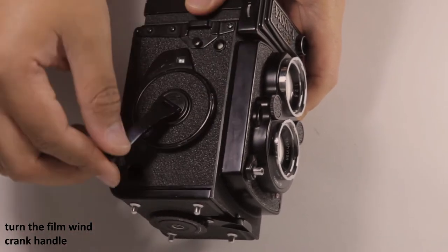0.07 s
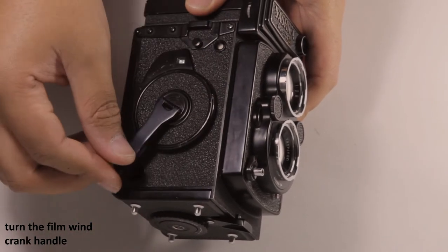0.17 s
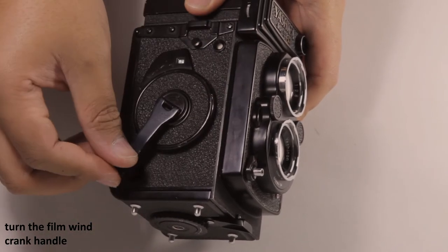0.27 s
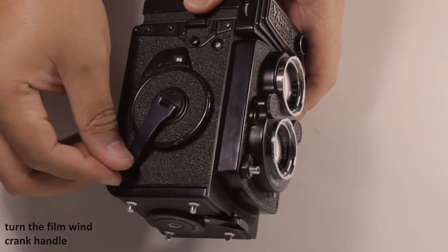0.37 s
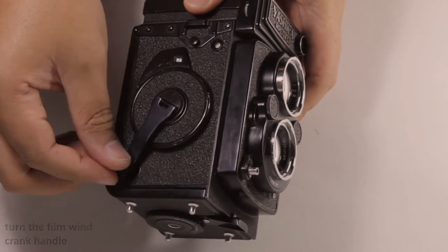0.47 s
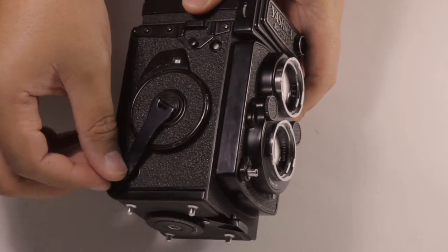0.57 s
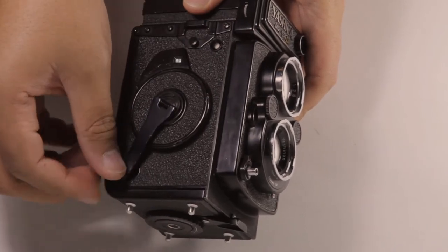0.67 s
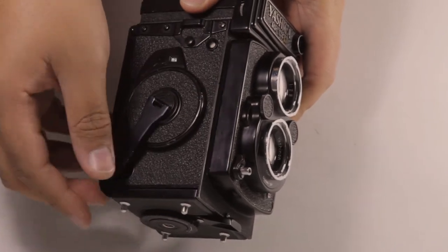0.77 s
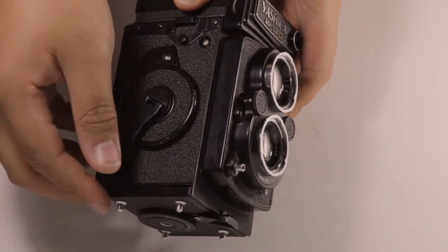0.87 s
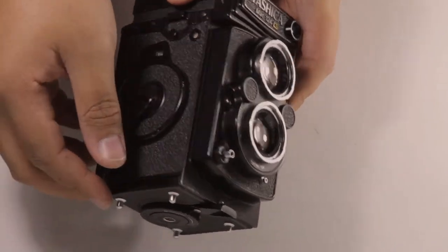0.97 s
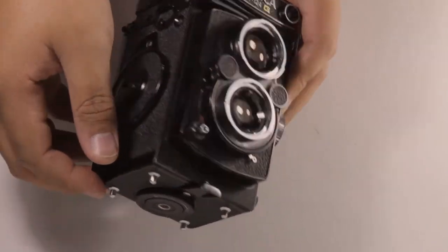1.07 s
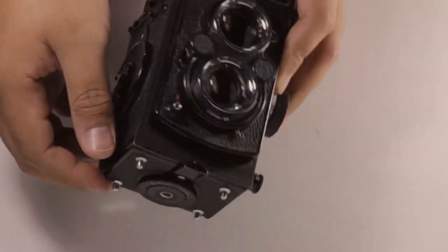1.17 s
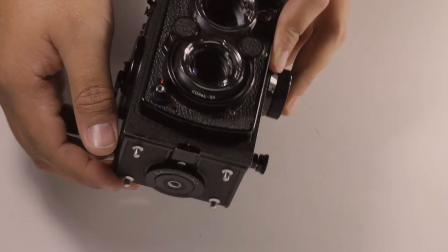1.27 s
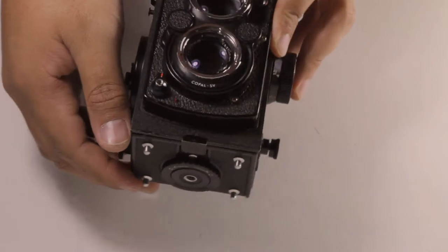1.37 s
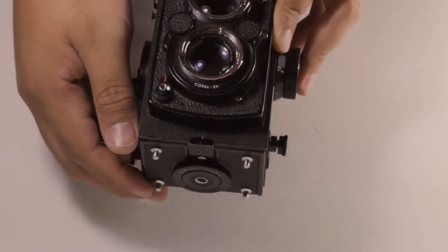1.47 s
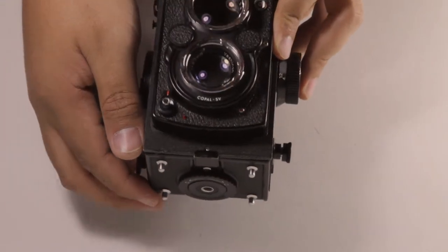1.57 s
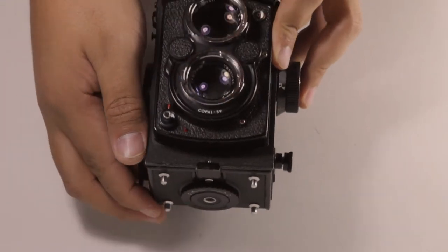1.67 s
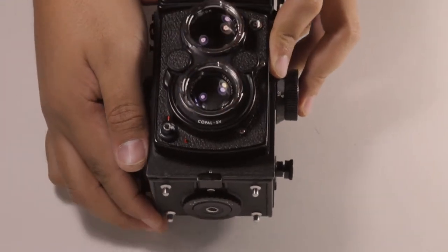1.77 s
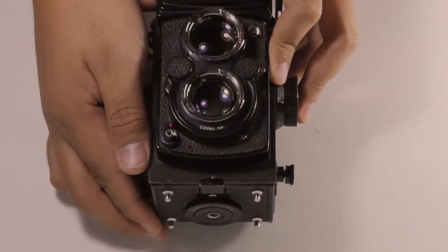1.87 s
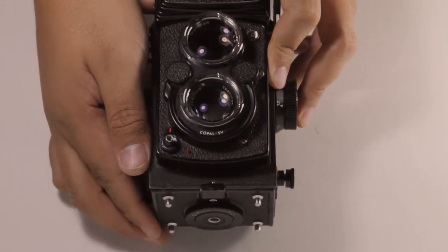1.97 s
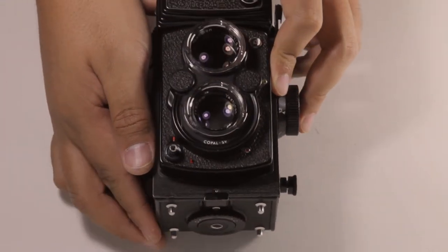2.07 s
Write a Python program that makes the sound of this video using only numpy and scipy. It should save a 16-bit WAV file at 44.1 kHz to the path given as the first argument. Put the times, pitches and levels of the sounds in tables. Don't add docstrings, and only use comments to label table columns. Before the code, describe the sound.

Close up in a small quiet room, one bright hard snap leads several smaller metallic clicks and soft finger thumps from a camera crank, then a brief faint drag, a pause, and gentle rubbing with a tiny tap.

```python
import sys
import numpy as np
from scipy import signal
from scipy.fft import rfft, irfft
from scipy.io import wavfile
from scipy.ndimage import uniform_filter1d

SR = 44100
rng = np.random.default_rng(int(sys.argv[2]) if len(sys.argv) > 2 else 0)


def unload_wav(signal):
    wavfile.write(
        sys.argv[1],
        SR,
        np.round(np.clip(np.atleast_2d(signal).T, -1, 1) * 32767).astype(np.int16),
    )


def gain_from_db(level_db):
    decades = np.asarray(level_db, float) / 20
    return 10 ** decades


N = 92610


def evened(x):
    return x / np.sqrt(np.mean(x ** 2) + 1e-20)


def read(points, hz):
    f, value = np.transpose(points)
    return np.interp(np.log(hz + 1), np.log(f + 1), value)


def add(mix, s, sound):
    part = mix[round(s * SR):][:len(sound)]
    part += sound[:len(part)]


def coloured(x, gain):
    return irfft(rfft(x) * gain(np.fft.rfftfreq(len(x), 1 / SR)), len(x))


def resonate(x, hz, width_hz):
    turn = np.exp(2j * np.pi * np.cumsum(hz * np.ones(len(x))) / SR)
    r = np.exp(-np.pi * width_hz / SR)
    return 2 * (turn * signal.lfilter([1 - r], [1, -r], x / turn)).real


def part_gain(colour, rings, f, spread):
    gain = gain_from_db(read(colour, f))
    for hz, width_hz, db in rings:
        widening = 1 + spread * hz
        detune = 2 * (f - hz) / max(width_hz, 50) / widening
        gain = gain + gain_from_db(db) * np.minimum(f / hz, 1) ** 2 / np.sqrt(widening) / (1 + detune ** 2)
    return gain


def minimum_phase(gain):
    cep = irfft(np.log(gain + 1e-6))
    cep[1:2048] *= 2
    cep[2048:] = 0
    return irfft(np.exp(rfft(cep)))


def blow(colour, rings, s, peak_db, contact_s):
    slip_s, slip_db, ring_spread_hz = 0.0015, -38, 3000
    t, f = np.arange(4096) / SR - slip_s, np.fft.rfftfreq(4096, 1 / SR)
    press = np.where(t < 0, gain_from_db(slip_db), np.exp(-(t / max(contact_s, 1e-5)) ** 2))
    force = press * rng.standard_normal(len(t))
    force[round(slip_s * SR)] = 1.2
    unevenness = np.sqrt(uniform_filter1d(abs(rfft(force)) ** 2, size=8))
    both = []
    for spread in (0, 1 / ring_spread_hz):
        body = minimum_phase(part_gain(colour, rings, f, spread) / unevenness)
        both.append(signal.fftconvolve(force, body)[:len(t)])
    return s - slip_s, gain_from_db(peak_db) * np.transpose(both) / abs(both[0]).max()


def blows(colour, rings, hits):
    out = np.zeros((N, 2))
    for hit in hits:
        add(out, *blow(colour, rings, *hit))
    return out


# pitch_hz, level_db per Hz
HANDLE_COLOUR = [(200, -58), (500, -39.5), (900, -45), (2600, -18), (5000, -20), (11500, -7), (15000, -7),
                 (16500, -20.5)]
# pitch_hz, width_hz, level_db over the crack
HANDLE_RINGS = [(1214, 115, 1), (1806, 160, -4.5), (3620, 550, -5), (6660, 440, -1.5), (9600, 730, 4),
                (11800, 400, 1), (12000, 630, -8), (13100, 414, -12.5), (15130, 650, -6.5)]
# start_s, peak_db, contact_s
HANDLE_HITS = [
    (0.2115, 0.0038, 0.0019),
]


def handle():
    return blows(HANDLE_COLOUR, HANDLE_RINGS, HANDLE_HITS)


# pitch_hz, level_db per Hz
PAWL_COLOUR = [(1180, -52.5), (2000, -36), (3060, -20), (4710, -19), (6950, -6.5), (8290, -7), (11600, 1),
               (16500, -13.5)]
# pitch_hz, width_hz, level_db over the crack
PAWL_RINGS = [(7000, 590, -4), (11400, 710, -3.5), (14300, 950, -1), (3220, 550, -10)]
# start_s, peak_db, contact_s
PAWL_HITS = [
    (0.127, -28, 0.00077),
]


def pawl():
    return blows(PAWL_COLOUR, PAWL_RINGS, PAWL_HITS)


# pitch_hz, level_db per Hz
HINGE_COLOUR = [(1470, -44), (2500, -28), (3070, -2), (4630, -5), (8110, -3.5), (9350, -4), (13900, 0.5),
                (16500, -10.5)]
# pitch_hz, width_hz, level_db over the crack
HINGE_RINGS = [(6830, 1000, 1), (12000, 1500, -3), (13950, 700, 3), (8750, 600, -14)]
# start_s, peak_db, contact_s
HINGE_HITS = [
    (0.3460, -22.5, 0.0037),
    (0.352, -27, 0.0015),
    (0.358, -31, 0.005),
]


def hinge():
    return blows(HINGE_COLOUR, HINGE_RINGS, HINGE_HITS)


# pitch_hz, level_db per Hz
CATCH_COLOUR = [(1470, -39), (2500, -18), (5330, -12), (7500, -11), (9500, -4), (13000, -2), (15000, 0),
                (16500, -33)]
# pitch_hz, width_hz, level_db over the crack
CATCH_RINGS = [(9600, 810, -2), (13000, 720, 0.52), (14300, 350, 0)]
# start_s, peak_db, contact_s
CATCH_HITS = [
    (0.3903, -33, 0.003),
]


def catch():
    return blows(CATCH_COLOUR, CATCH_RINGS, CATCH_HITS)


# pitch_hz, level_db per Hz
BOX_COLOUR = [(240, -27), (500, -29), (1500, -22), (2300, -9), (4500, -12.5), (6200, -16), (9500, -16),
              (13000, -8), (15500, -29.5)]
# pitch_hz, width_hz, level_db over the crack
BOX_RINGS = [(778, 185, 6), (1233, 190, -0.5), (1640, 390, 2), (2580, 140, -0.5), (3400, 620, -4.5),
             (5800, 410, -9), (7650, 170, -23), (12300, 320, -23), (12800, 420, -18)]
# start_s, peak_db, contact_s
BOX_HITS = [
    (0.5368, -12.5, 0.0011),
]


def box():
    return blows(BOX_COLOUR, BOX_RINGS, BOX_HITS)


# pitch_hz, level_db per Hz
PIN_COLOUR = [(1000, -54), (5000, -42), (8000, -32), (10500, -14.5), (13000, -21), (15300, -4),
              (16800, -19)]
# pitch_hz, width_hz, level_db over the crack
PIN_RINGS = [(11500, 800, 0), (14150, 330, 5), (1420, 700, -22), (12900, 400, -8)]
# start_s, peak_db, contact_s
PIN_HITS = [
    (0.7246, -13, 0.00073),
]


def pin():
    return blows(PIN_COLOUR, PIN_RINGS, PIN_HITS)


# pitch_hz, level_db per Hz
FOOT_COLOUR = [(120, -34), (250, -11), (2000, 1), (4600, 0.5), (8300, -10), (14800, -13), (16500, -46)]
# pitch_hz, width_hz, level_db over the crack
FOOT_RINGS = [(1120, 320, 9), (1940, 200, 4), (4670, 350, -12)]
# start_s, peak_db, contact_s
FOOT_HITS = [
    (1.8903, -29, 0.0006),
]


def foot():
    return blows(FOOT_COLOUR, FOOT_RINGS, FOOT_HITS)


# pitch_hz, level_db per Hz
PANEL_COLOUR = [(300, -15), (700, -35), (1300, -11), (2000, -16), (3500, -15.5), (6000, -65)]
# pitch_hz, width_hz, level_db over the crack
PANEL_RINGS = [(1305, 140, 7.5), (1900, 150, -1), (790, 150, 2.5), (485, 150, -9.5), (1590, 248, -9)]
# start_s, peak_db, contact_s
PANEL_HITS = [(0.131, -44.5, 0.002), (0.3469, -25, 0.0014), (0.3501, -25.5, 0.0018), (.354, -31.5, 0.0069),
              (.358, -32.5, 0.0037), (.362, -30.5, 0.0033), (0.373, -33.5, 0.0017), (1.013, -47, 0.0035),
              (1.978, -53, .003), (1.987, -49, .002), (2.019, -47, 0.0024), (2.022, -45, 0.0025),
              (2.033, -48, .004), (2.047, -55, 0.0021)]


def panel():
    return blows(PANEL_COLOUR, PANEL_RINGS, PANEL_HITS)


# pitch_hz, level_db per Hz
PAD_COLOUR = [(120, -11.5), (400, 4), (1000, -8.5), (1800, -4.5), (2600, -19.5), (4000, -15), (7000, -50)]
# pitch_hz, width_hz, level_db over the thud
PAD_RINGS = [(467, 540, -27)]
# start_s, peak_db, contact_s
PAD_HITS = [
    (0.338, -35.5, 0.00036),
    (0.3669, -29, .0003),
    (0.3834, -26, 0.00044),
    (1.827, -37, 0.0003),
]


def finger_pad():
    return blows(PAD_COLOUR, PAD_RINGS, PAD_HITS)


# pitch_hz, level_db per Hz
PALM_COLOUR = [(80, -19), (250, -9), (500, -10), (1200, -21), (3000, -44)]
# start_s, peak_db, contact_s
PALM_HITS = [
    (0.7374, -33, 0.0015),
    (0.746, -40.5, 0.0011),
]


def palm():
    return blows(PALM_COLOUR, [], PALM_HITS)


# start_s, length_s, level_db, start_hz, end_hz
SQUEAKS = [(.389, 0.068, -52, 11900, 11400), (0.25, 0.095, -60, 1200, 1260),
           (.728, 0.077, -62, 16000, 16000), (.73, 0.046, -68, 18000, 11500),
           (.543, 0.063, -53, 2620, 2700), (.543, .04, -52, 16000, 15000), (.55, .09, -56.5, 11000, 11200),
           (2.043, 0.047, -54, 13100, 12300), (2.049, .025, -57, 5700, 5650),
           (2.056, 0.016, -64, 7000, 8600)]


def squeaks():
    width_hz = 260
    out, noise = np.zeros(N), rng.standard_normal(N)
    for s, length, db, start_hz, end_hz in SQUEAKS:
        u = np.arange(0, 1, 1 / (length * SR))
        hz = start_hz + (end_hz - start_hz) * u
        tone = noise[round(s * SR):][:len(u)]
        tone = resonate(resonate(tone, hz, width_hz), hz, width_hz)
        add(out, s, gain_from_db(db - 12 * u) * np.sin(np.pi * u) ** 0.49 * evened(tone))
    return out


def grit(spread_db):
    grains_per_s = 5000
    size = gain_from_db(spread_db * np.minimum(rng.exponential(1, N), 4))
    size = size * (rng.random(N) < grains_per_s / SR)
    return evened(size * rng.standard_normal(N) + 0.26 * rng.standard_normal(N))


# start_s, level_db
DRAG_PUSHES = [
    [(.8, -72), (.9, -69), (.98, -59), (1.015, -51), (1.022, -79), (1.06, -90)],
    [(1.7, -82), (1.756, -82), (1.762, -59), (1.81, -61.5), (1.83, -56.5), (1.884, -60), (1.89, -59),
     (1.915, -55.5), (1.93, -61.5), (1.975, -55.5), (2.0, -56.5), (2.022, -51), (2.06, -58.5), (2.1, -59.5)],
]
# pitch_hz, level_db per Hz
DRAG_COLOUR = [(120, -24.5), (200, 1), (950, -1), (1840, 0.5), (2960, -8), (4040, -10.5), (5730, -15.5),
               (12800, -24), (16000, -36)]
# pitch_hz, width_hz, level_db
DRAG_RINGS = [
    [(1250, 120, -1.5), (2240, 220, -13), (3200, 160, -14.5), (3970, 200, -11.5), (9060, 190, -14.5)],
    [(570, 190, -6.5), (1480, 260, -12), (1770, 430, -16)],
]


def drag():
    t, out = np.arange(N) / SR, np.zeros(N)
    slips = grit(1.4)
    rub = evened(coloured(slips, lambda hz: gain_from_db(read(DRAG_COLOUR, hz))))
    for curve, rings in zip(DRAG_PUSHES, DRAG_RINGS):
        s, db = np.transpose(curve)
        push = gain_from_db(np.interp(t, s, db, -120, -120))
        ringing = sum(gain_from_db(level) * evened(resonate(slips, hz, width)) for hz, width, level in rings)
        out += push * (rub + ringing)
    return gain_from_db(1.5) * out


# start_s, length_s, level_db, centre_hz
BRUSHES = [(0.026, 0.08, -64.5, 13000), (1.204, 0.07, -65, 12000), (1.311, .04, -66, 12000),
           (1.764, 0.038, -57, 11500), (1.761, .035, -54.5, 4500), (1.9, 0.02, -56.5, 3960),
           (1.902, .018, -66, 10000), (2.042, 0.035, -57, 13500), (2.055, 0.029, -55, 5000),
           (2.082, .018, -62, 12500)]


def brushes():
    octaves, floor_db = 0.3, 3
    out, slips = np.zeros(N), grit(1.55)
    for s, length, db, centre_hz in BRUSHES:
        part = slips[round(s * SR):][:round(length * SR)]
        u = np.arange(len(part)) / len(part)

        def tint(hz):
            band = np.exp(-(np.log2((hz + 1) / centre_hz) / octaves) ** 2)
            return gain_from_db(floor_db) * hz / (hz + 2500) + band

        add(out, s, gain_from_db(db) * np.sin(np.pi * u ** 0.63) * evened(coloured(part, tint)))
    return out


# delay_s, level_db
ECHOES = [(.0028, -14), (.0086, -19), (.0148, -24), (.019, -31), (.0235, -33), (.03, -37)]
# pitch_hz, t60_s
ROOM_DECAY = [(300, 0.3), (1200, 0.33), (4000, 0.27), (10000, 0.26), (16000, 0.11)]


def room(direct, spread):
    tail_db, tail_start_s, smear_s = -11, 0.0016, 0.0002
    hz, t, z = signal.stft(rng.standard_normal(SR // 2), SR, nperseg=128)
    tail = signal.istft(z * gain_from_db(-60 * t / read(ROOM_DECAY, hz)[:, None]), SR, nperseg=128)[1]
    tail *= np.clip(np.arange(len(tail)) / SR / tail_start_s - 0.5, 0, 1)
    path = gain_from_db(tail_db) * tail / np.linalg.norm(tail)
    for s, db in ECHOES:
        smear = rng.standard_normal(65) * np.exp(-np.arange(65) / SR / smear_s)
        smear = np.diff(smear, prepend=0)
        add(path, s, gain_from_db(db) * smear / np.linalg.norm(smear))
    return direct + signal.fftconvolve(spread, path)[:N]


# pitch_hz, level_db per Hz
AIR_COLOUR = [(12, -41), (20, -11.5), (114, -5.5), (265, -5), (322, -7), (791, -8), (1390, -17.5),
              (12400, -26), (16400, -32)]
# pitch_hz, width_hz, level_db
HUMS = [(108, 57, -65.5), (531, 45, -64), (764, 53, -67), (348.5, 10.3, -68.5)]


def air():
    noise = rng.standard_normal((2, N))
    bed = gain_from_db(-56) * evened(coloured(noise[0], lambda hz: gain_from_db(read(AIR_COLOUR, hz))))
    return bed + sum(gain_from_db(db) * evened(resonate(noise[1], hz, width)) for hz, width, db in HUMS)


def scene():
    crank = handle() + pawl() + hinge() + catch() + pin()
    body = box() + foot() + panel()
    hands = finger_pad() + palm()
    rubbing = squeaks() + drag() + brushes()
    direct, spread = (crank + body + hands).T + rubbing
    return (room(direct, spread) + air())[None]


def low_pass(x):
    return signal.sosfilt(signal.butter(12, 16820, fs=SR, output="sos"), x)


def record(dry):
    edge_hz = 16170
    lowpass = signal.firwin(255, edge_hz, window=("kaiser", 8), fs=SR)
    x = signal.oaconvolve(dry, lowpass[None], "same")
    return low_pass(np.clip(x, -1, 1))


dry = scene()
out = record(dry)
unload_wav(out)
```